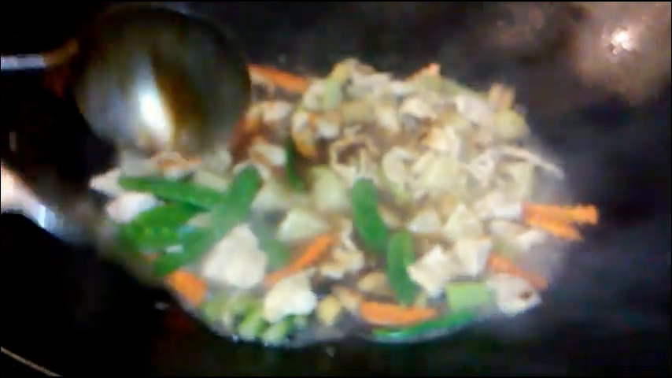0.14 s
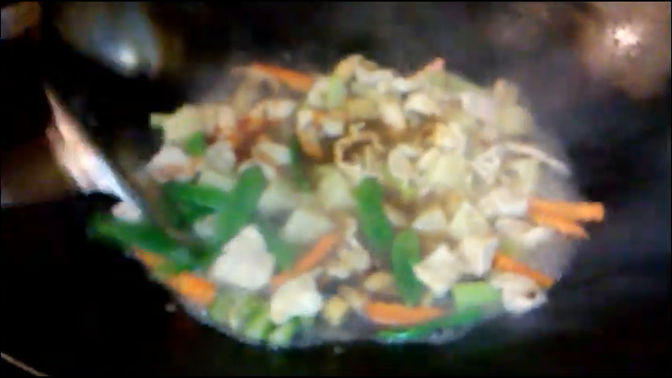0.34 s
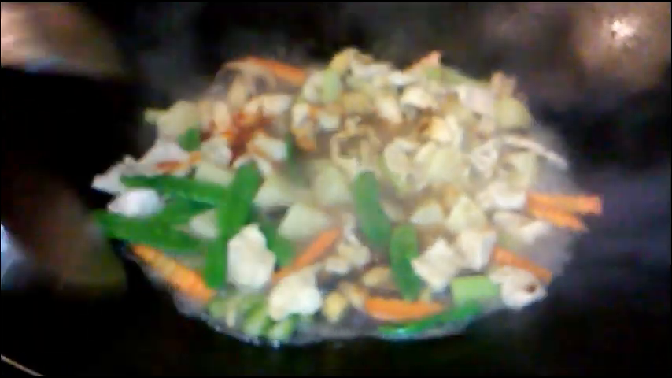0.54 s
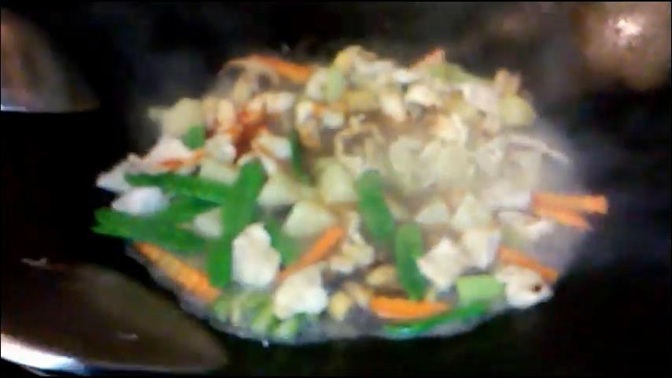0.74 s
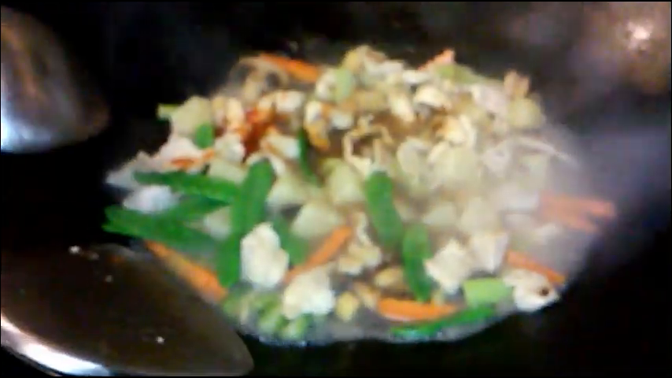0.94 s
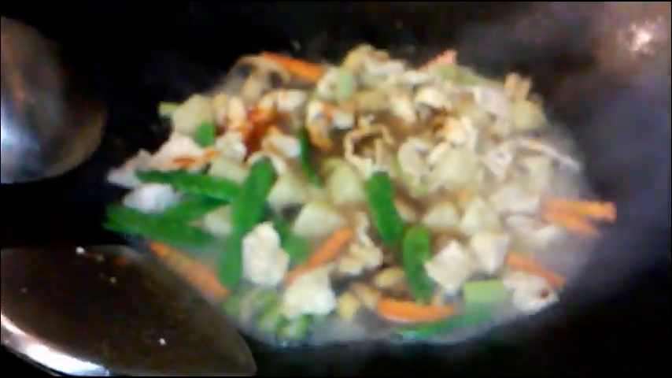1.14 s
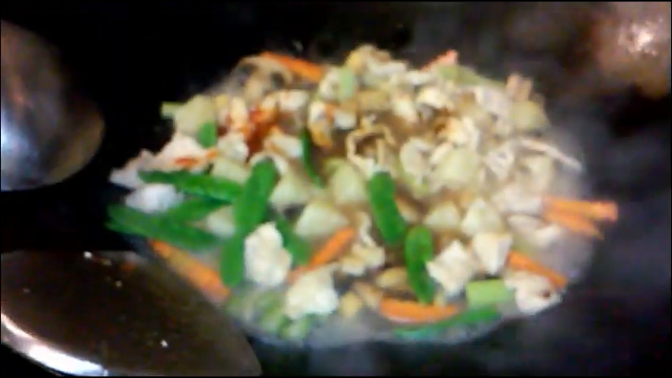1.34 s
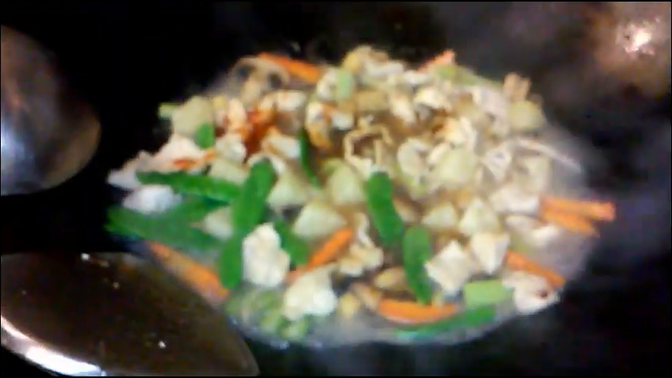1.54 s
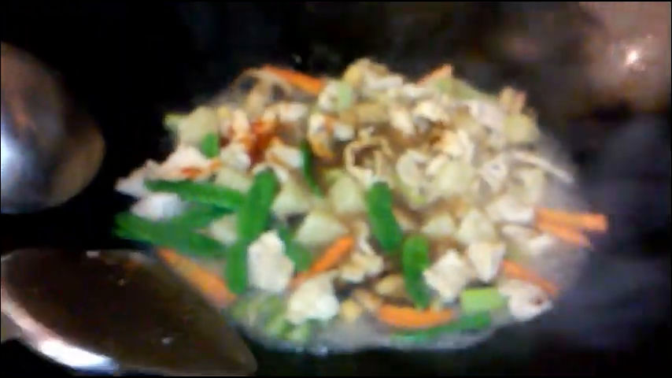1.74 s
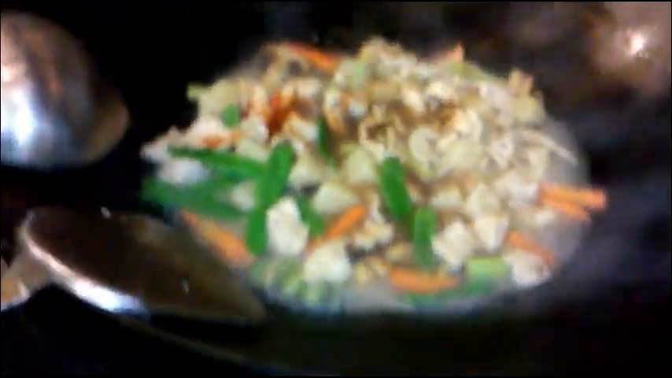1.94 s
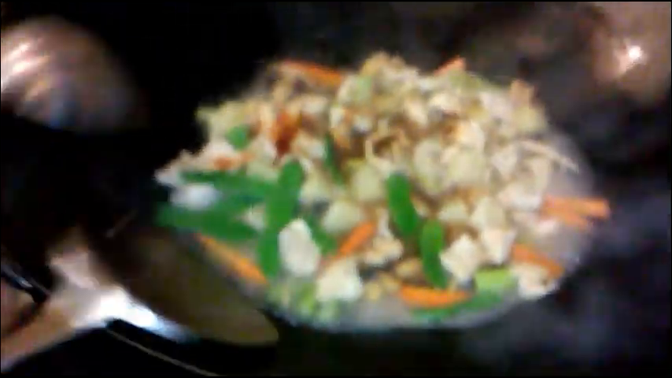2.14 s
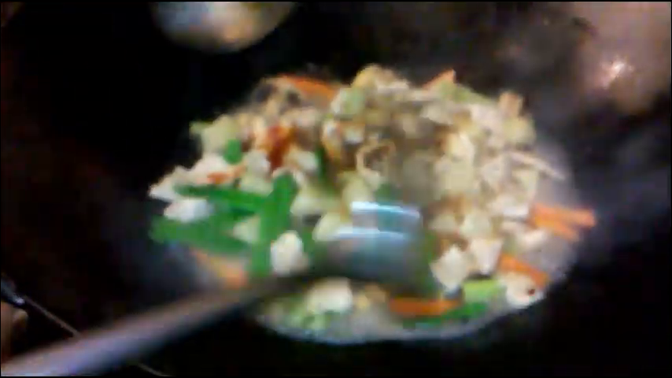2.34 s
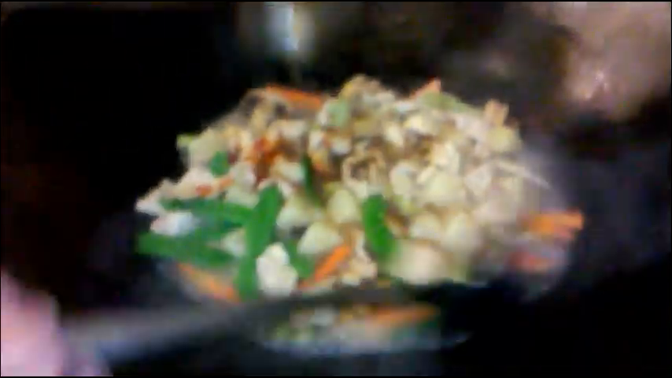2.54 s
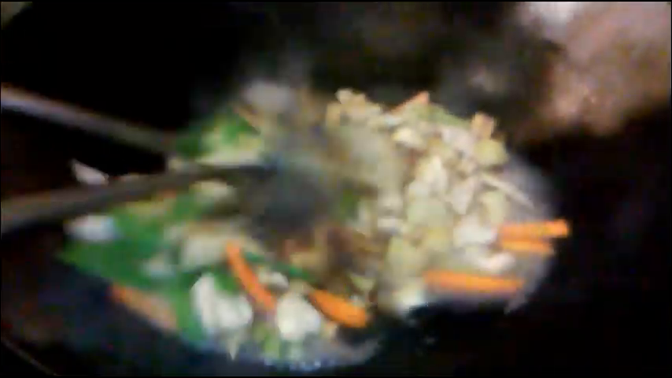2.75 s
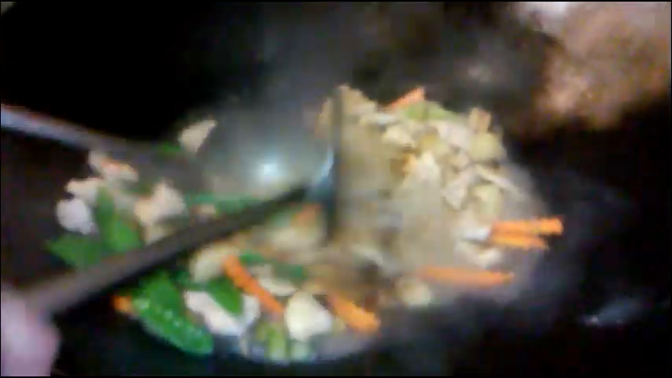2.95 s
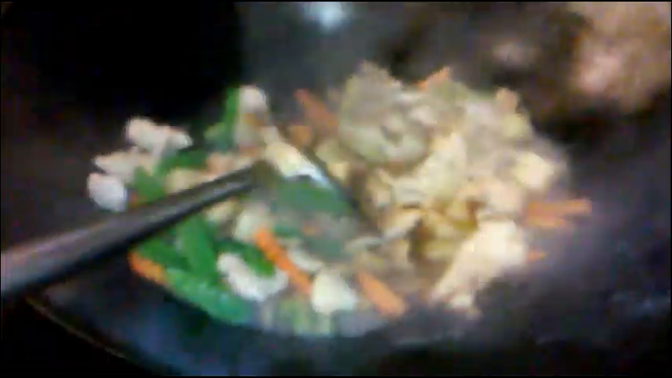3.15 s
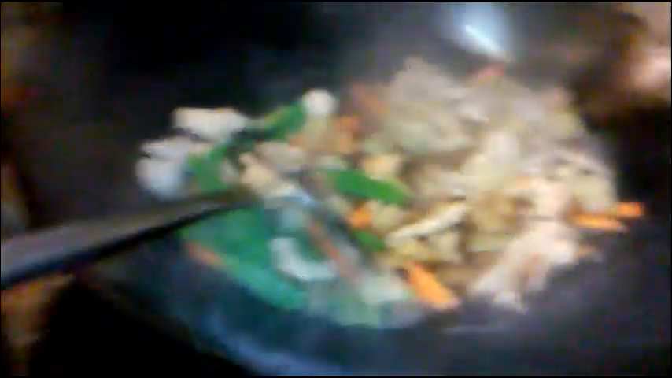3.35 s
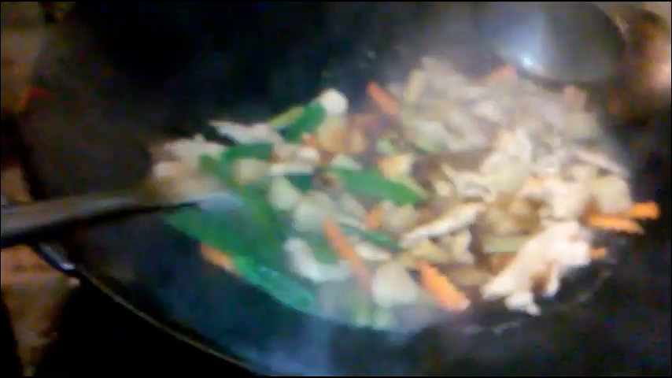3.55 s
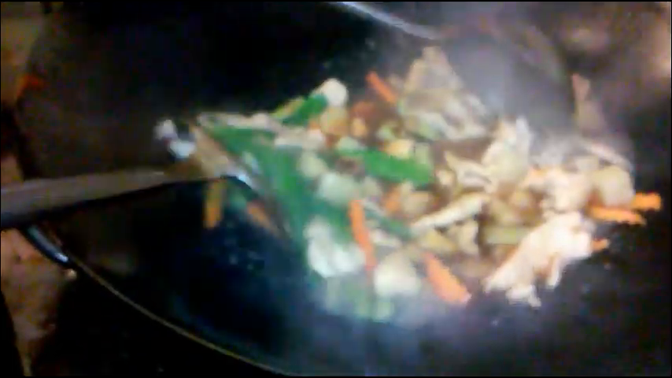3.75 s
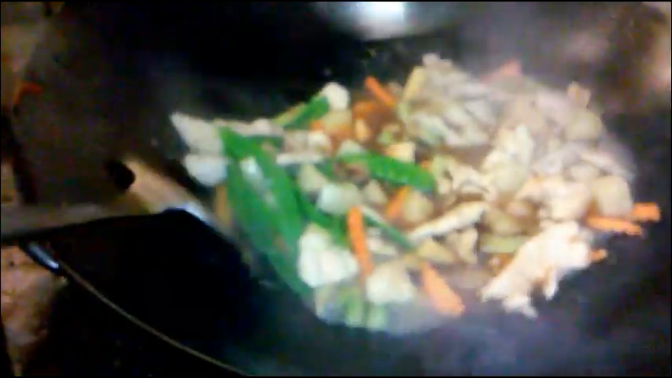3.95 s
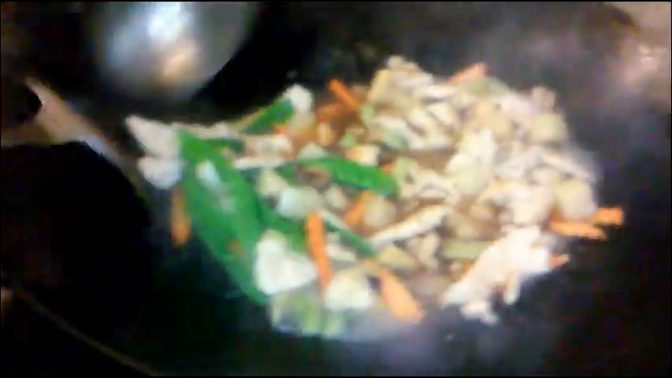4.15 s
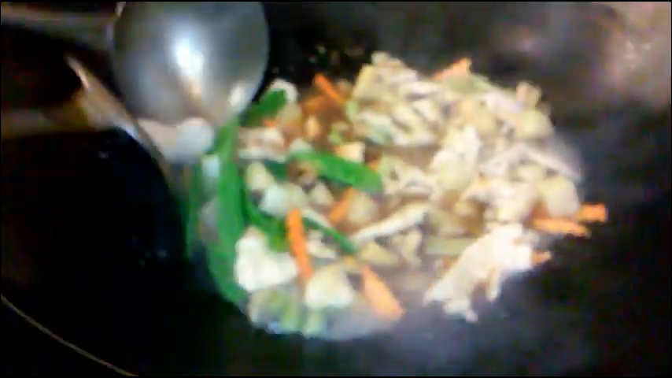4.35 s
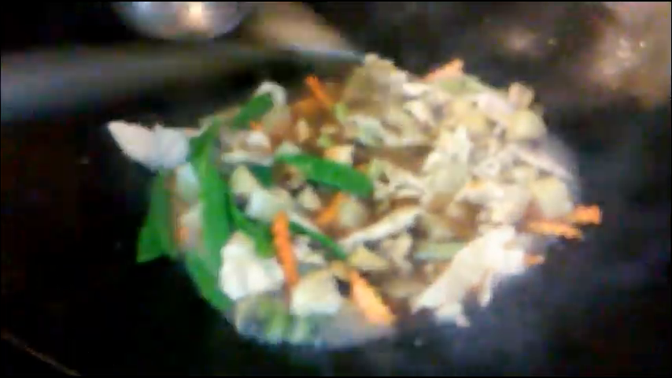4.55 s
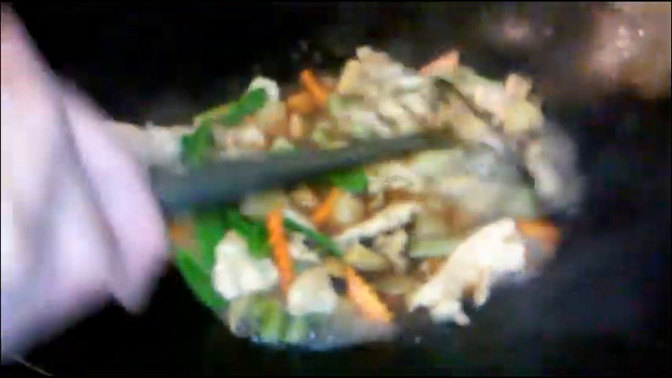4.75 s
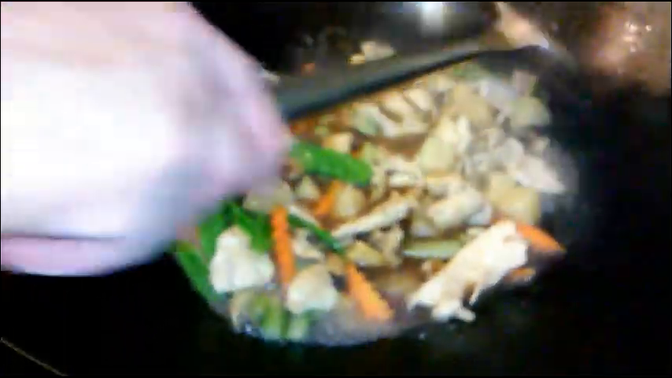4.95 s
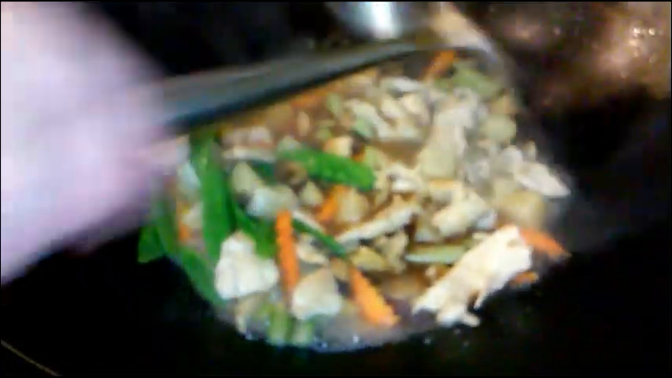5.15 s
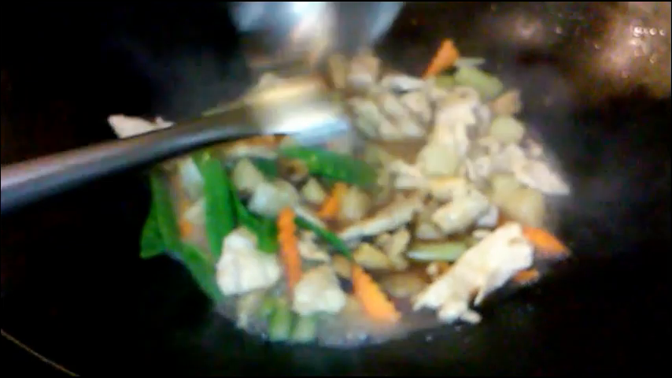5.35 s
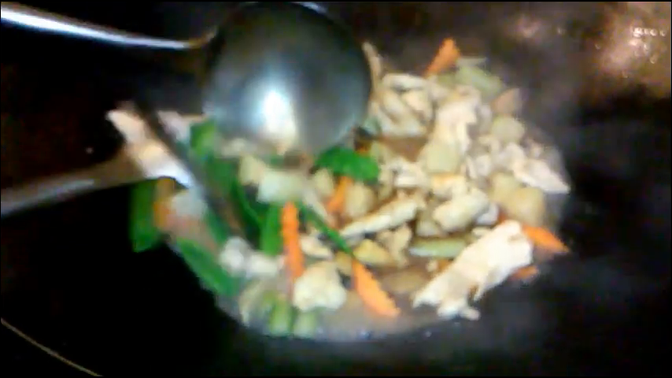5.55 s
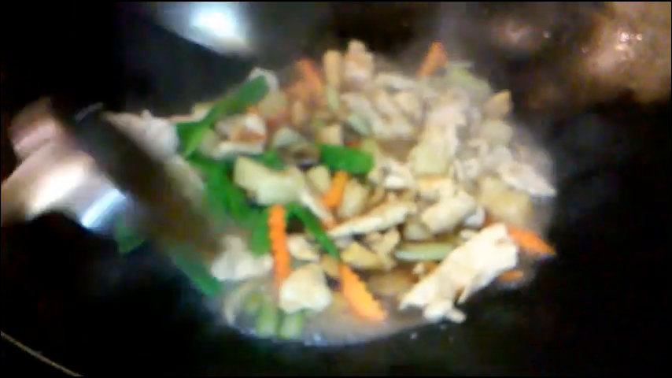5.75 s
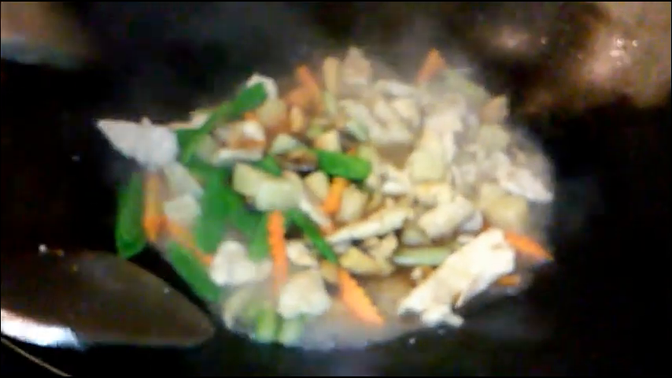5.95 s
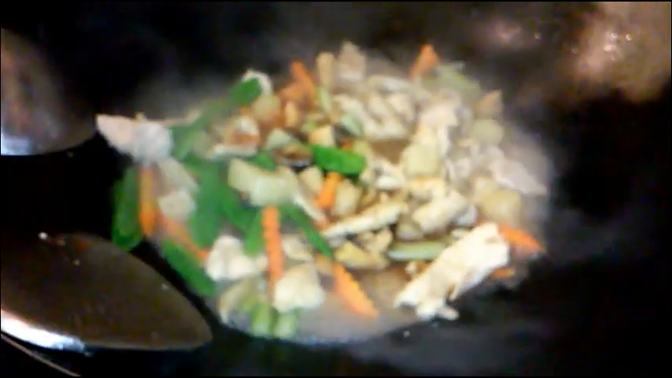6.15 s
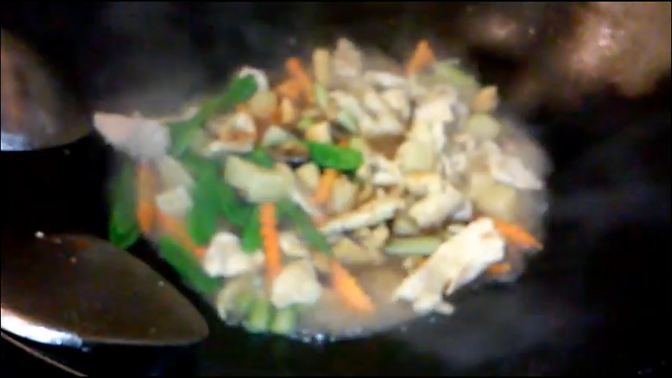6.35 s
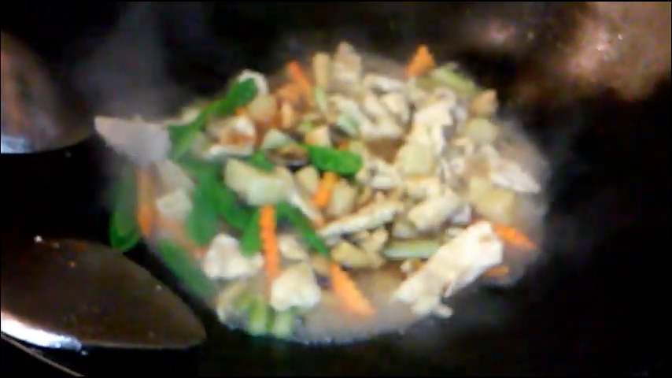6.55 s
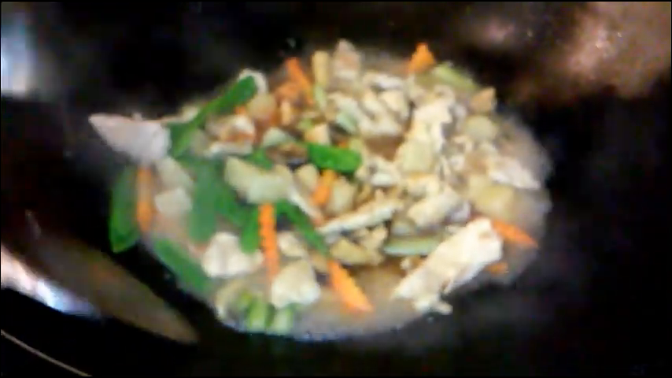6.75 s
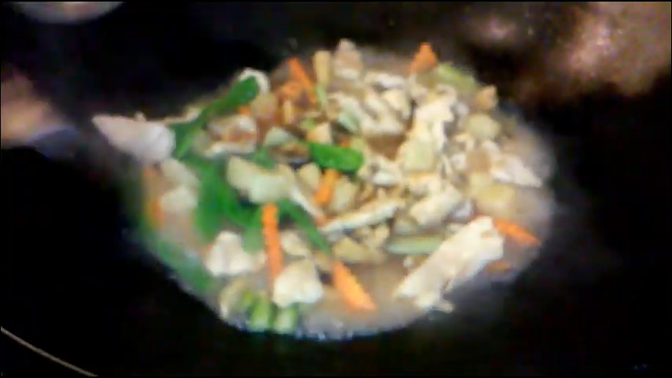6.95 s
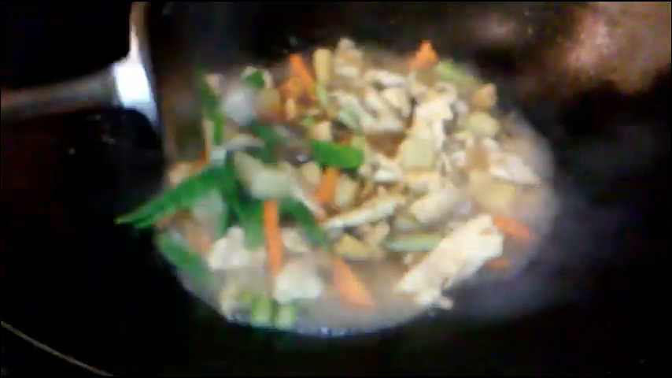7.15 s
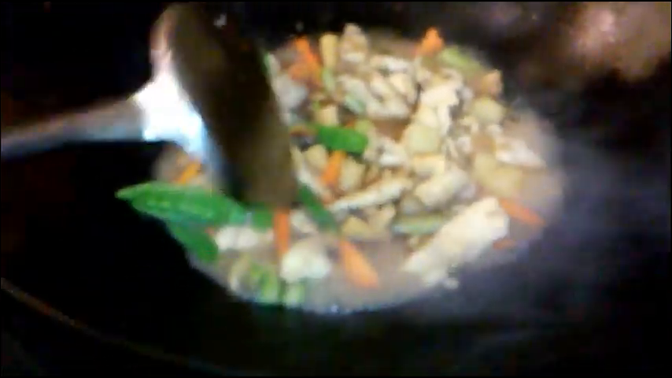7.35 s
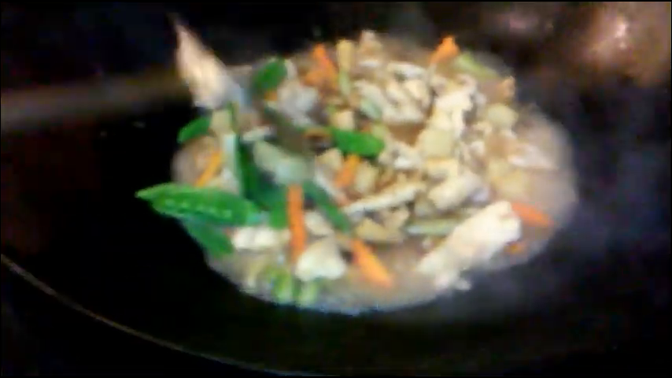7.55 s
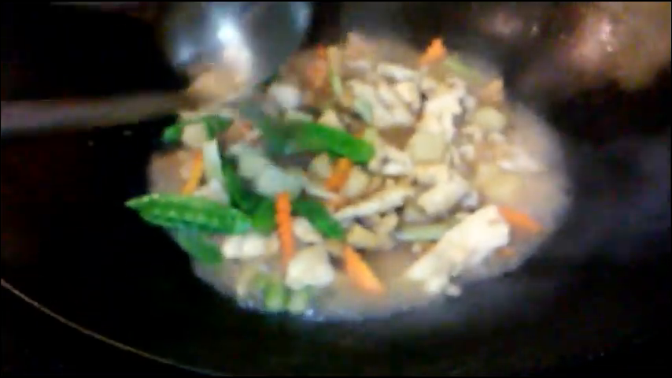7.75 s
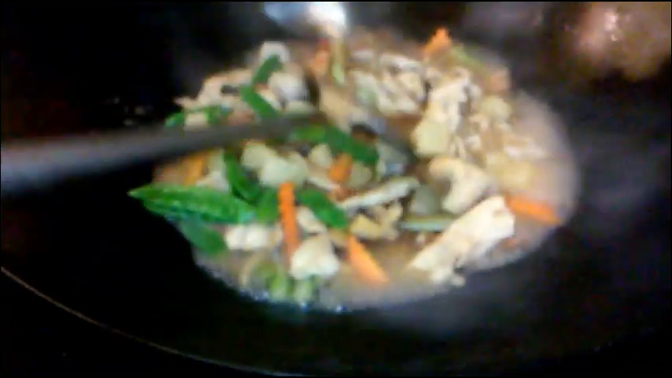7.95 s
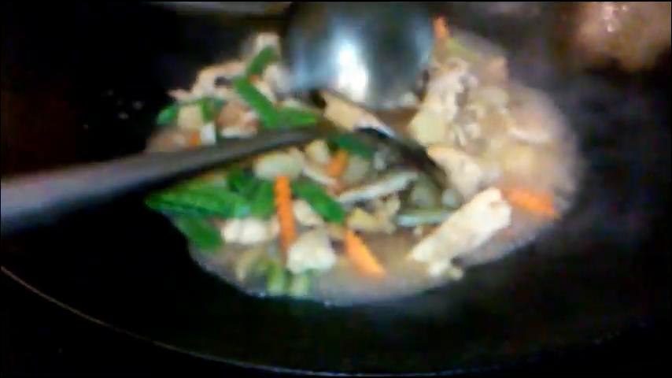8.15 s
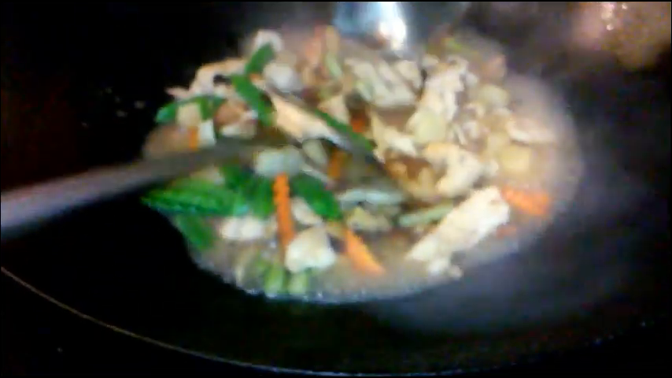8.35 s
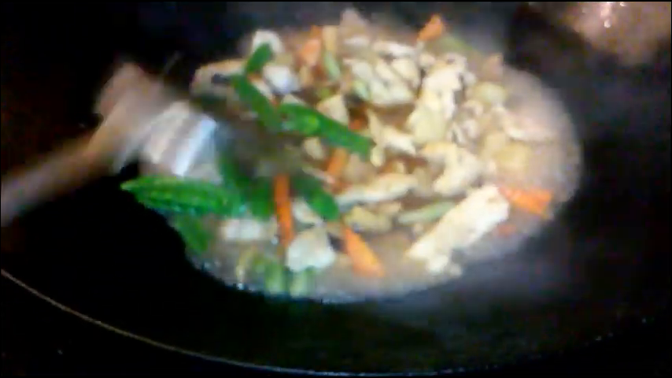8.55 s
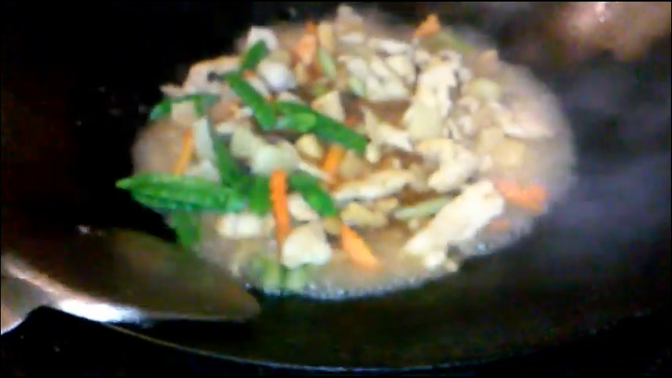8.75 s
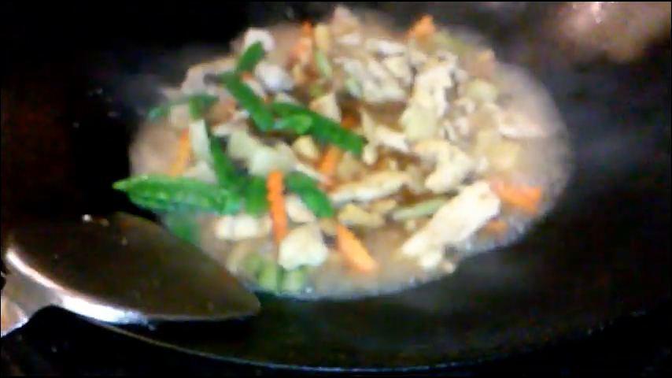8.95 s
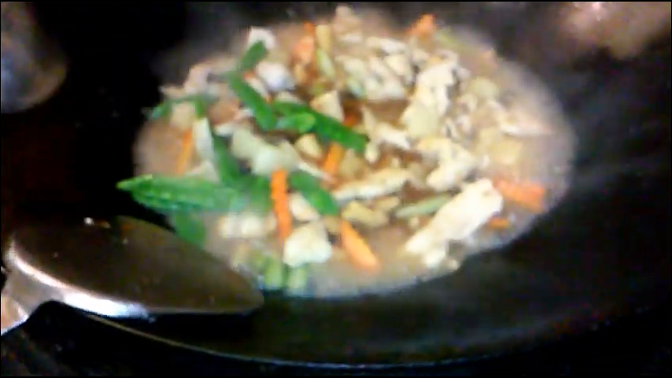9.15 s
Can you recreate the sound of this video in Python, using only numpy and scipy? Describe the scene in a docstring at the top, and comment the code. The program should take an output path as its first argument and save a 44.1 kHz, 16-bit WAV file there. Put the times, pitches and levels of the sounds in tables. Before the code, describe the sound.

Vegetables and chicken sizzle in a steel wok over a rumbling gas burner while a metal spatula knocks, scrapes and clinks.

```python
"""Vegetables and chicken sizzle in a steel wok over a rumbling gas burner, in a small kitchen.
A spatula clinks on a ladle, then knocks and scrapes on the bowl; near 2.6 s its edge squeaks, and the
turned food flares into its loudest sizzle. The ladle clinks again after 4 s; hard blows and a flare
follow at 6 s, a lower squeak near 7 s. The flame gulps after 8 s, before the last knocks and flare.
Throughout, the close mono microphone overloads on the hard blows."""
import sys
import numpy as np
from scipy import signal
from scipy.fft import rfft, irfft
from scipy.io import wavfile
from scipy.ndimage import uniform_filter1d

SR = 44100
rng = np.random.default_rng(int(sys.argv[2]) if len(sys.argv) > 2 else 0)


def transcribe(u):
    """Save the signal u as a 16-bit wav file named by the first command-line argument.

    u: samples, shape (n,) or (channels, n), limited to [-1, 1]; the rate is SR.
    q: integer samples, one column per channel.
    """
    v = np.clip(np.atleast_2d(u).T, -1, 1)
    q = np.round(v * 32767).astype(np.int16)
    wavfile.write(sys.argv[1], SR, q)


N = 406161
TIME = np.arange(N) / SR

# Blows of the spatula on the wok and on the ladle: (time [s], relative ring level [dB],
# deep flex [dB re ring], edge crack [dB re ring], ring freedom [1 = no added damping],
# frequency favoured by the spot struck [Hz])
WOK_KNOCKS = [(0.491, 4.5, 5.5, -5, 0.55, 390), (0.564, -13, 1, -3, 0.46, 2760),
              (0.6344, 1, -13, -5.5, 1, 950), (0.6885, -4, -18, 6, 0.47, 2450),
              (0.7276, 8, -12, -11.5, 0.9, 2410), (0.832, -1, -7.5, -16, 0.52, 1640),
              (1.724, -19.5, -1, -39, 1.0, 1010), (2.1008, -6.5, -19, -37, 0.83, 1440),
              (2.1783, -1, -21.5, -23, 0.71, 2460), (2.545, 0, -28, 0.5, 0.39, 1700),
              (2.806, 5, -13.5, -14.5, 0.84, 1500), (3.082, -0.5, -30, -1.5, 0.7, 1870),
              (4.8139, -1, -11, 0, 0.57, 2130), (5.0874, 1, -2, 0.5, 0.57, 1040),
              (5.9247, 3, -36, -8, 0.9, 1670), (5.9502, 8.5, -30, -2, 1.0, 2500),
              (6.0108, 8, 6, -13, 0.96, 2700), (6.1139, 3, -16, -32, 1, 1780),
              (6.7814, -0.5, -9, -19, 0.8, 1530), (8.7243, 4, 1, -5, 0.74, 2280),
              (8.83, 4.5, -17, -35, 0.92, 2550), (9.1105, 8.5, -4, -13, 0.65, 1560),
              (9.1871, 9, -13, -17, 1.0, 1320)]
LADLE_CLINKS = [(0.0458, -16.5, 0.5, 2, 0.47, 2820), (0.0613, 3, -33, -2.5, 0.61, 2810),
                (1.0932, -11, -21, -21, 1.0, 2110), (4.192, -6, -36.5, 0, 1, 1230),
                (4.2843, 9.5, -40, -5.5, 0.5, 2430), (4.3214, -0.5, -30, -4, 0.41, 1300)]
# Normal modes of the two bodies: (frequency [Hz], relative level [dB], T60 [s])
WOK_MODES = [(365, -6, .14), (432, -5, .15), (470, -5, .15), (612, -6, .17), (742, -6, .17), (845, -6, .15),
             (1020, -6, .18), (1150, -11, .15), (1328, -4, .22), (1442, -5, .2), (1567, -1, .18),
             (1628, -2, .22), (1700, -4, .14), (2058, -6, .14), (2380, -3, .12), (2454, 2, .17),
             (2560, -3, .11), (2660, -3, .12), (2745, -1, .16), (2884, -3, .13), (3200, -15, .1),
             (3795, -16, .12), (6500, -20, .1), (8700, -20, .1)]
LADLE_MODES = [(1255, 1, .27), (1335, -1, .25), (1430, -1, .24), (1515, -1, .23), (1610, -4, .22),
               (1830, -9, .3), (2425, 1, .17), (2645, -4, .16), (2785, -5, .14), (3800, -17, .15),
               (5260, -19, .12), (6950, -18, .15), (7500, -18, .15), (8480, -12, .16), (9120, -17, .12)]


def gain_of(db):
    """Amplitude ratio of a level in decibels."""
    return 10 ** (np.asarray(db) / 20)


def unit_rms(x):
    """Normalisation to unit mean power."""
    return x / np.sqrt(np.mean(x ** 2) + 1e-20)


def curve_at(points, hz):
    """Interpolation of (frequency, value) points on a logarithmic frequency axis."""
    point_hz, value = np.transpose(points)
    return np.interp(np.log(hz + 1), np.log(point_hz + 1), value)


def add(mix, start, sound):
    """Superposition: the sound joins the mix at start seconds."""
    part = mix[max(round(start * SR), 0):][:len(sound)]
    part += sound[:len(part)]


def wander(size, rate_hz):
    """Random fluctuation: low-pass Gaussian noise of unit rms."""
    hz = np.fft.rfftfreq(size, 1 / SR)
    return unit_rms(irfft(rfft(rng.standard_normal(size)) / (1 + (hz / rate_hz) ** 2), size))


def coloured(x, spectrum, size=4096):
    """Minimum-phase filtering by a spectral envelope; the result has unit rms."""
    log_gain = np.log(gain_of(curve_at(spectrum, abs(np.fft.fftfreq(size, 1 / SR)))))
    taps = np.fft.ifft(np.exp(np.conj(signal.hilbert(log_gain)))).real
    return unit_rms(signal.oaconvolve(x, taps[:size // 2])[:len(x)])


def damped(x, t60_curve):
    """Frequency-dependent damping: each band decays exponentially, 60 dB in its T60."""
    hz, t, bands = signal.stft(x, SR, nperseg=256)
    decay = np.exp(-np.log(1000) * t / curve_at(t60_curve, hz)[:, None])
    return signal.istft(bands * decay, SR, nperseg=256)[1][:len(x)]


def impulses(size, per_s, spread_db):
    """Poisson process: clicks of either sign, many small and a few large, at unit rms."""
    chance, draw, sign = rng.random((3, size))
    strength = np.minimum(-np.log(1 - draw), 6)
    return unit_rms((chance < per_s / SR) * np.sign(sign - .5) * gain_of(spread_db * strength))


def burner(level_db=-32, swell_db=1.3, hollow_hz=135):
    """Turbulent combustion roars; the hollow under the wok booms in resonance when the flame gulps."""
    # Spectrum of the flame: (frequency [Hz], relative spectral density [dB])
    roar_spectrum = [(10, -12.5), (25, -1), (40, -5), (55, -4), (90, 1), (115, -3.5), (135, 4.5), (160, -7),
                     (195, -2.5), (250, -14.5), (340, -21), (550, -25), (1200, -19.5), (4000, -41)]
    # Gulps of the flame: (time [s], duration [s], level [dB])
    gulps = [(2.35, 0.066, -24), (4.23, 0.047, -35), (7.12, 0.041, -31), (8.11, 0.074, -24.5),
             (8.385, 0.064, -27.5), (8.45, 0.05, -26.5), (8.60, 0.031, -27.5)]
    swell = gain_of(level_db + swell_db * wander(N, rate_hz=2.9))
    out = swell * coloured(rng.standard_normal(N), roar_spectrum, size=16384)
    for start, length, db in gulps:
        t = TIME[:int(length * SR)]
        boom = np.hanning(len(t)) * np.sin(2 * np.pi * (hollow_hz * t + rng.random()))
        add(out, start, gain_of(db) * unit_rms(boom))
    return out


def sizzle_level(simmer_db=-34.5):
    """Incoherent summation: wettings spread and boil off, adding power to a steady simmer; in dB."""
    # Wet food meeting hot steel: (time [s], spreading time [s], level [dB], boil-off time constant [s])
    flares = [(0.0, 0.0075, -27, 0.91), (0.52, 0.059, -33, 0.55), (1.1, 0.013, -27.5, 0.16),
              (1.923, 0.0012, -21.5, 0.029), (2.15, 0.056, -37, 0.26), (2.38, 0.42, -24, 0.34),
              (2.77, 0.15, -9.5, 0.73), (3.75, 0.42, -24, 0.48), (5.66, 0.01, -31, 0.092),
              (5.98, 0.16, -20.5, 0.7), (7.486, 0.005, -25.5, 0.55), (7.55, 0.2, -23, 0.14),
              (8.265, 0.0056, -22.5, 0.17), (8.27, 0.37, -24, 1), (9.11, 0.13, -14, 0.4)]
    power = np.full(N, gain_of(simmer_db) ** 2)
    for start, spread, db, boil_off in flares:
        wetness = np.minimum(TIME / spread, 1) * np.exp(-np.maximum(TIME - spread, 0) / boil_off)
        add(power, start, (gain_of(db) * wetness) ** 2)
    return 10 * np.log10(power)


def bubbles(spectrum, per_s, spread_db, hiss_db, clump_db):
    """Shot noise: bubbles burst in clumps over the hiss of countless tiny ones."""
    bursts = impulses(N, per_s, spread_db) + gain_of(hiss_db) * rng.standard_normal(N)
    return coloured(bursts * gain_of(clump_db * wander(N, rate_hz=29)), spectrum)


def sauce_blips(sizes=24, per_s=90, decay_cycles=10, pitch_rise=.06):
    """Bubble resonance: each larger bubble in the sauce rings as a short rising note."""
    t = TIME[:SR // 20]
    out = np.zeros(N)
    for hz in np.geomspace(1150, 2500, sizes):
        age = hz * t / decay_cycles
        envelope = (1 - np.exp(-10 * age)) * np.exp(-age)
        glide = 1 + pitch_rise * (1 - np.exp(-age / 2))
        note = envelope * np.sin(2 * np.pi * hz * t * glide)
        out += signal.oaconvolve(impulses(N, per_s / sizes, spread_db=2), note)[:N]
    return unit_rms(out)


def spits():
    """Flash evaporation: drops of water explode in the fat with sharp snaps."""
    # Spectrum of a snap: (frequency [Hz], relative spectral density [dB])
    snap_spectrum = [(500, -18), (2500, -11), (5000, -4), (8000, -3), (12500, -5)]
    return coloured(impulses(N, per_s=25, spread_db=2.5), snap_spectrum)


def frying(full_flare_db=-10, coarse_slope=1.98, boil_slope=1.6):
    """Vaporisation on hot steel: in a flare, coarse spatter and boiling outgrow the fine spatter."""
    # Fine spatter, coarse spatter of wet food, and boiling juice coloured by the bowl:
    # (frequency [Hz], relative spectral density [dB])
    fine_spectrum = [(1500, -40), (3000, -16), (4800, -17.5), (6000, -8), (7000, -2.5), (8100, 0),
                     (9200, -3.5), (11000, -1.5), (12600, -5.5)]
    coarse_spectrum = [(1000, -32), (2400, 9.5), (3000, -4), (3500, 2.5), (4300, 3.5), (6000, 8),
                       (7500, -27), (12000, -31)]
    juice_spectrum = [(200, -20), (400, -12), (740, -33), (910, 8.5), (1090, -3.5), (1290, 10.5),
                      (1430, -2.5), (1600, 10), (1780, 8.5), (2050, 11), (2220, 10.5), (2400, 7.5),
                      (2750, -15), (4500, -4.5)]
    fine = bubbles(fine_spectrum, per_s=2400, spread_db=8, hiss_db=9, clump_db=1)
    coarse = bubbles(coarse_spectrum, per_s=5000, spread_db=3, hiss_db=9, clump_db=2)
    juice = bubbles(juice_spectrum, per_s=980, spread_db=2, hiss_db=-0.5, clump_db=1.4)
    juice += gain_of(-7) * sauce_blips()
    sizzle_db = sizzle_level()
    flare_db = sizzle_db - full_flare_db
    spatter = gain_of(sizzle_db + 1) * fine + gain_of(-17 + coarse_slope * flare_db) * coarse
    boil_gain = np.hypot(gain_of(-39), gain_of(-20 + boil_slope * flare_db))  # at rest, and flaring
    return spatter + gain_of(sizzle_db - 19) * spits() + boil_gain * juice


def steel_ring(modes, crowd_db, spot_hz, scatter_db=4.5, spot_q=6, spot_boost_db=4):
    """Modal impulse response of a utensil; the point of contact favours the modes near spot_hz."""
    # The crowd of weaker modes in thin steel: (frequency [Hz], relative spectral density [dB])
    crowd_spectrum = [(100, -51), (250, -5.5), (400, -11), (700, -7.5), (1100, -1.5), (1600, -1.5),
                      (2000, -2.5), (2600, -4.5), (3000, -6.5), (3600, -12), (7000, -11), (12500, -12)]
    # Decay of that crowd: (frequency [Hz], T60 [s])
    crowd_t60 = [(300, 0.35), (1500, 0.35), (2800, 0.29), (4000, 0.11), (12000, 0.1)]
    t = TIME[:SR // 2]
    hz, db, t60 = np.transpose(modes)[:, :, None]
    scatter, phase = rng.standard_normal((len(modes), 2)).T[:, :, None]
    envelopes = gain_of(db + scatter_db * scatter) * np.exp(-np.log(1000) * t / t60)
    tones = envelopes * np.sin(2 * np.pi * (hz * t + phase))
    crowd = damped(coloured(rng.standard_normal(len(t)), crowd_spectrum), crowd_t60)
    ring = unit_rms(tones.sum(0)) + gain_of(crowd_db) * unit_rms(crowd)
    favoured = signal.lfilter(*signal.iirpeak(spot_hz, spot_q, fs=SR), ring)
    return ring + gain_of(spot_boost_db) * favoured


def balance_bands(x, flex_db, edge_db, window_s, flex_hz=820, edge_hz=3500):
    """Band weighting: deep flex, ring (0 dB) and bright edge are each set by their peak short-time rms."""
    cuts = [(flex_hz, "low"), ([flex_hz, edge_hz], "band"), (edge_hz, "high")]
    filters = [signal.butter(4, hz, kind, fs=SR, output="sos") for hz, kind in cuts]
    bands = np.array([signal.sosfilt(sos, x) for sos in filters])
    peak_power = uniform_filter1d(bands ** 2, int(window_s * SR), axis=1, mode="constant").max(1)
    return gain_of([flex_db, 0, edge_db]) / np.sqrt(peak_power + 1e-20) @ bands


def squeaks(trim_db=1, jitter=.045, flutter_db=4.5, attack_s=0.0022, release_s=0.025):
    """Periodic stick-slip: the edge sings a rough, sagging tone whose overtones smear into hiss."""
    # Squeaking strokes: (time [s], duration [s], relative level [dB], pitch [Hz], pitch sag [fraction],
    # octave [dB re fundamental], each higher overtone [dB re fundamental])
    strokes = [(2.546, 0.077, -14, 2620, 0.143, -22, -28), (2.614, 0.067, -13.5, 2490, 0.0092, -8, -12),
               (6.92, 0.19, -22, 1338, 0.2, 1.5, -12)]
    out = np.zeros(N)
    for start, length, db, hz, sag, octave_db, overtone_db in strokes:
        t = TIME[:int(length * SR)]
        slowing = sag * (t / length) ** 3.3  # the stroke slows late
        cycles = np.cumsum(hz * (1 - slowing) * (1 + jitter * wander(len(t), rate_hz=450))) / SR
        partials_db = [0, octave_db - 68 * slowing] + [overtone_db] * 5  # the octave fades with the sag
        tone = np.zeros(len(t))
        for harmonic, partial_db in enumerate(partials_db, 1):
            amplitude = gain_of(partial_db + flutter_db * wander(len(t), rate_hz=100))
            tone += amplitude * np.sin(2 * np.pi * harmonic * cycles)
        grip = np.minimum(t / attack_s, 1) * np.minimum((length - t) / release_s, 1)
        add(out, start, gain_of(db + trim_db) * grip * tone)
    return out


def pressure(length, bite_s=0.0061, held_share=0.47, ease_db=-19.5):
    """Normal force during a stroke: the edge bites, is held, then eases off."""
    t = TIME[:int(length * SR)]
    easing = np.maximum(t / length - held_share, 0) / (1 - held_share)
    return np.minimum(t / bite_s, 1) * gain_of(ease_db * easing)


def scrapes(trim_db=-3, chatter_db=4.5, skid_s=0.041):
    """Irregular stick-slip: each slip rings the steel, in whole strokes and in a skid after each blow."""
    # Strokes over the wok: (time [s], duration [s], relative ring level [dB], deep flex [dB re ring],
    # edge hiss [dB re ring], chatter frequency of the blade [Hz])
    strokes = [(0.511, 0.08, -15.5, -2.5, -19, 2480), (0.643, 0.19, -10, -17, -24, 1630),
               (2.017, 0.25, -27, -14.5, -40, 1340), (2.556, 0.13, -21, -42, 3.5, 1660),
               (2.77, 0.04, -23.5, -25, -12, 1400), (3.672, 0.026, -33.5, -14, 11, 2770),
               (4.006, 0.077, -22, -36, 3.5, 2750), (4.153, 0.05, -25.5, -22, -5, 1310),
               (5.928, 0.22, -5.5, -18, -17, 2670), (6.708, 0.033, -14, -34, -0.5, 2680),
               (6.848, 0.11, -28.5, -37, -26, 2500), (6.933, 0.21, -29.5, -25, 10, 2480),
               (8.728, 0.19, -13, -6.5, -3, 2350), (9.109, 0.19, -6, -7.5, -10.5, 2670)]
    slips = impulses(N, per_s=420, spread_db=4.5) * gain_of(chatter_db * wander(N, rate_hz=90))
    slides = []
    for modes, strikes in [(WOK_MODES, WOK_KNOCKS), (LADLE_MODES, LADLE_CLINKS)]:
        for start, db, flex_db, edge_db, _, spot_hz in strikes:  # a skid is far weaker than its blow
            slides.append((modes, start, skid_s, db - 21.5, flex_db + 1, edge_db + 5.5, spot_hz))
    slides += [(WOK_MODES, *stroke) for stroke in strokes]
    out = np.zeros(N)
    for modes, start, length, db, flex_db, edge_db, spot_hz in slides:
        drive = slips[int(start * SR):][:int(length * SR)]
        force = drive * pressure(length)[:len(drive)]
        ring = signal.fftconvolve(force, steel_ring(modes, crowd_db=1.5, spot_hz=spot_hz))
        add(out, start, gain_of(db + trim_db) * balance_bands(ring, flex_db, edge_db, length))
    return out


def blows(strikes, modes, crowd_db, force_db, flex_trim_db, edge_trim_db):
    """Impact excitation: a blow sets the steel in free vibration, damped by the hand and the food."""
    out = np.zeros(N)
    for start, db, flex_db, edge_db, freedom, spot_hz in strikes:
        damping_per_s = 10 * (1 / max(freedom, .1) ** 2 - 1)
        ring = steel_ring(modes, crowd_db, spot_hz)
        ring *= np.exp(-damping_per_s * TIME[:len(ring)])
        blow = balance_bands(ring, flex_db + flex_trim_db, edge_db + edge_trim_db, window_s=0.0052)
        add(out, start, gain_of(db + force_db) * blow)
    return out


def kitchen(x, wet_db, delay_s=0.0036):
    """Reverberation: dense reflections from hard walls close by follow the direct sound."""
    # Reverberation time of the room: (frequency [Hz], T60 [s])
    room_t60 = [(250, 0.31), (700, 0.63), (2000, 0.42), (5000, 0.67), (12000, 1)]
    reflections = impulses(SR // 2, per_s=3000, spread_db=0)
    tail = damped(reflections, room_t60) * (TIME[:SR // 2] > delay_s)
    return x + gain_of(wet_db) * signal.oaconvolve(x, tail / np.linalg.norm(tail))[:N]


def scene():
    """Superposition at one point: flame, food and utensils, alike in both channels."""
    knocks = blows(WOK_KNOCKS, WOK_MODES, crowd_db=1, force_db=-10, flex_trim_db=-6.5, edge_trim_db=7.5)
    clinks = blows(LADLE_CLINKS, LADLE_MODES,
                   crowd_db=-5, force_db=-11, flex_trim_db=-1, edge_trim_db=8.5)
    utensils = kitchen(knocks + clinks + scrapes() + squeaks(), wet_db=-11)
    food = kitchen(frying(), wet_db=-8)
    mono = burner() + food + utensils
    return np.array([mono, mono])


def record(dry, ceiling=0.79, knee=6, cutoff_hz=12600):
    """Saturation: the preamplifier clips with a firm knee, then a low-pass filter limits the band."""
    clipped = dry / (1 + (dry / ceiling) ** knee) ** (1 / knee)
    low_pass = signal.firwin(511, cutoff_hz, window=("kaiser", 8), fs=SR)
    return signal.oaconvolve(clipped, low_pass[None], "same")


dry = scene()
out = record(dry)
transcribe(out)
```